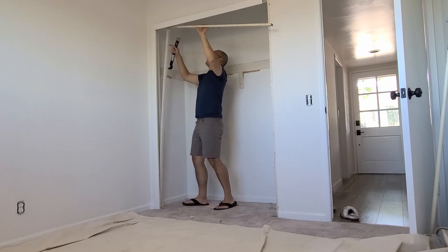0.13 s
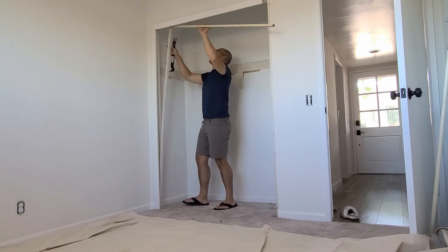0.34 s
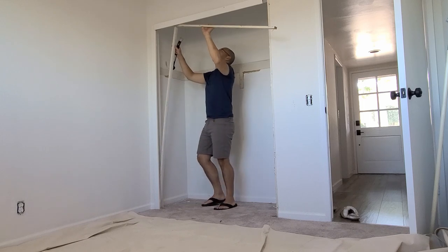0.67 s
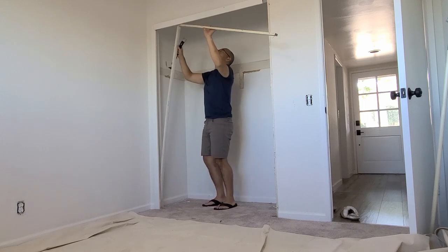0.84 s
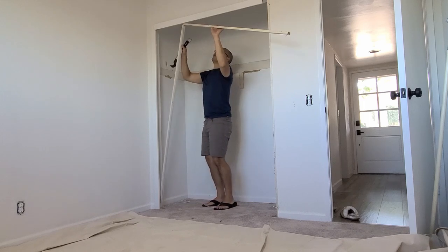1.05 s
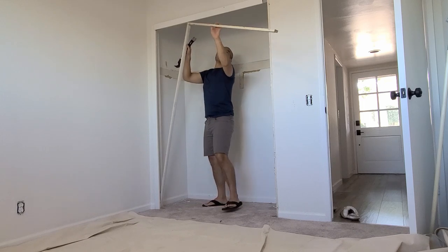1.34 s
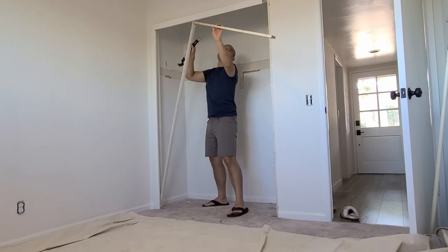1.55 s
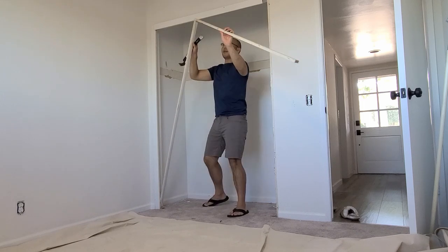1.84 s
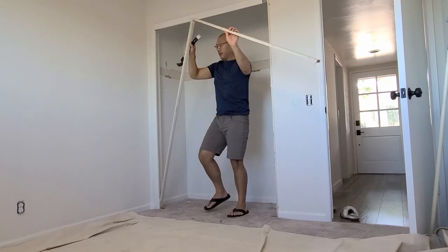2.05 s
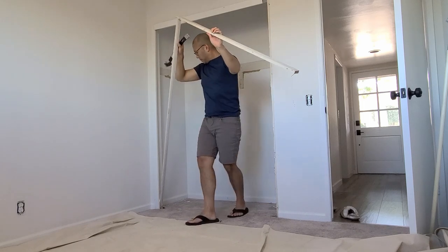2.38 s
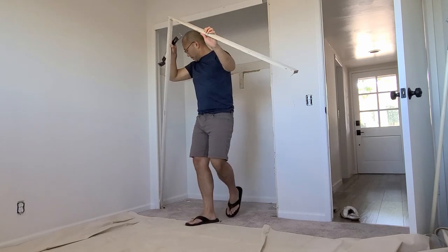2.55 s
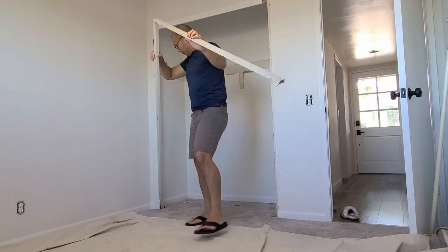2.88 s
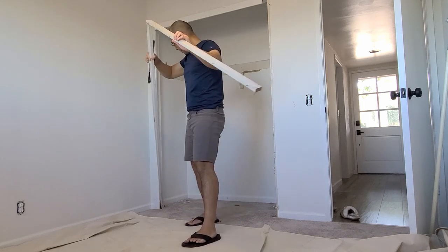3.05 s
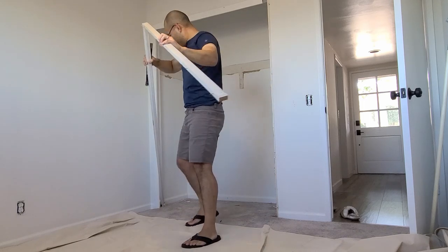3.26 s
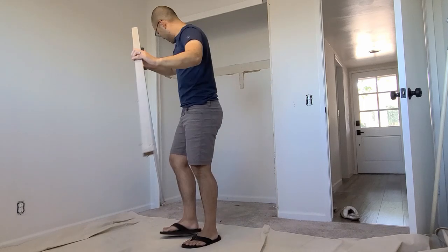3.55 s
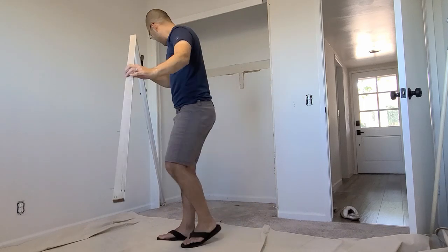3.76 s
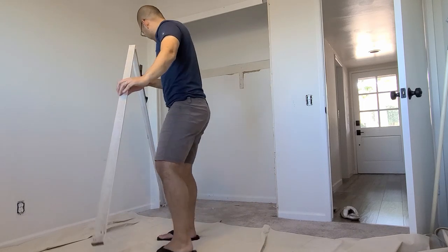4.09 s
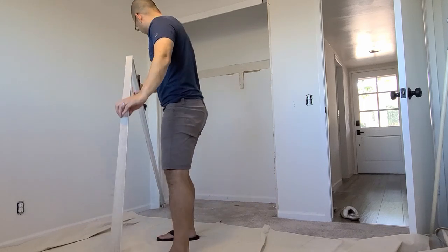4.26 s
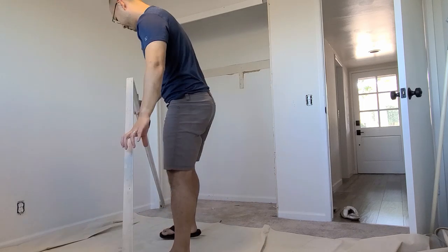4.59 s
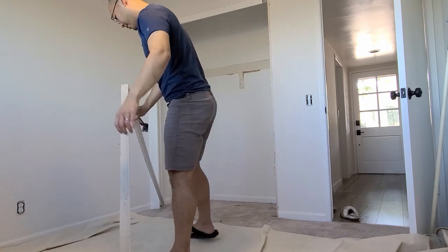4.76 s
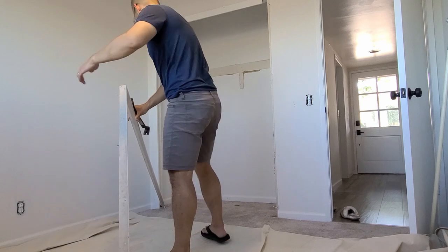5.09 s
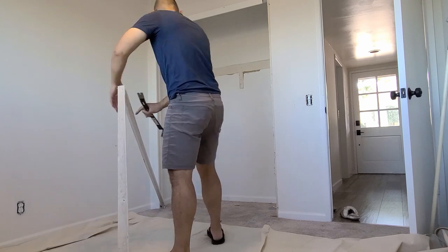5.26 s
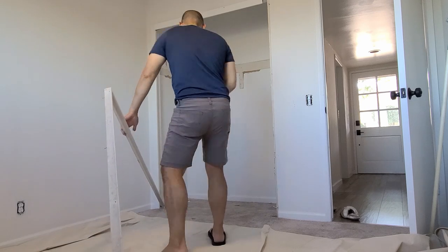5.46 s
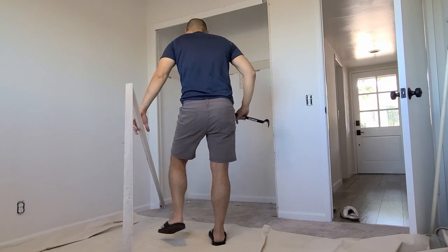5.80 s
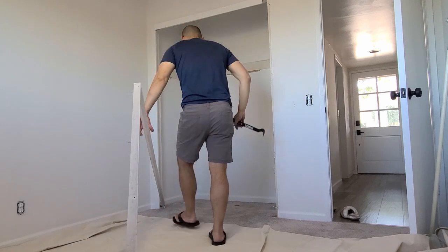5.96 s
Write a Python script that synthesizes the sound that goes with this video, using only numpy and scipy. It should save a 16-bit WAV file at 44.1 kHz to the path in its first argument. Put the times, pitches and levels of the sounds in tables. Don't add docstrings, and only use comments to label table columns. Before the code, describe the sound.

Painted wooden trim is pried loose in a bare, echoing room: sharp nail cracks, hollow wall thumps, then boards knocking down on the floor.

```python
import sys
import numpy as np
from scipy import signal
from scipy.fft import rfft, irfft, next_fast_len
from scipy.io import wavfile
from scipy.ndimage import uniform_filter1d, map_coordinates

SR = 44100
rng = np.random.default_rng(int(sys.argv[2]) if len(sys.argv) > 2 else 0)


def rack_gain(trim_db):
    fader = np.asarray(trim_db, float)
    return 10 ** (fader / 20)


def generate_wav(signal):
    frames = np.transpose(np.atleast_2d(signal))
    scaled = np.clip(frames, -1, 1) * 32767
    pcm = np.round(scaled).astype(np.int16)
    wavfile.write(sys.argv[1], SR, pcm)


N = 270330

# frequency in Hz, level in dB per Hz.
RUMBLE_SPECTRUM = [(12, -50.5), (20, -8), (81, 6.5), (97, -4), (129, -2.5), (167, -18.5), (229, -3.5),
                   (289, -16), (308, -33), (338, -9), (361, -43.5), (411, -29), (450, -20), (580, -21.5),
                   (990, -120)]
# peak time in seconds, level in dB.
RUMBLE_SWELLS = [(0.02, -61.5), (1, -38.5), (3, -40), (3.599, -56), (4.7, -49.5), (5.55, -58)]
# frequency in Hz, level in dB per Hz.
AIR_SPECTRUM = [(180, -32), (300, 13), (392, -9.5), (494, -1), (915, -3), (1690, -2.5), (6520, -15),
                (9550, -22.5), (15000, -20), (16000, -43.5)]
# frequency in Hz, likeness from 0 to 1.
LEFT_RIGHT_LIKENESS = [(60, 0.96), (150, 0.98), (300, 0.85), (600, 0.11), (2000, 0), (12000, 0)]
# frequency in Hz, share of an event's 60 dB decay time.
ROOM_DECAY = [(300, 1.3), (1000, 1.33), (3000, 0.83), (6000, 0.92), (14000, 0.43)]
# delay in seconds, level in dB.
EARLY_ECHOES = [(.0035, 4), (.006, 5), (.011, -3), (0.02, -2.5), (0.027, -18)]
# frequency in Hz, lean to the left microphone in dB.
TREBLE_LEAN = [(200, -1), (1500, 0.43), (4000, 1.5), (9500, 1.1), (13000, 1.5)]
# middle in seconds, half length in seconds, rub level in dB, grit level in dB.
SCUFF_STROKES = [(0.725, 0.12, -42.5, -68), (0.792, 0.034, -55, -78), (0.907, 0.32, -91.5, -50),
                 (1.832, 0.56, -63.5, -70.5), (2.603, 0.43, -57, -62), (3.01, 0.32, -47.5, -60),
                 (3.17, 0.19, -48, -44.5), (3.326, 0.038, -77, -39), (3.713, 0.26, -57, -64.5),
                 (4.5, 2.2, -81, -70), (4.66, 0.11, -31.5, -52), (4.774, 0.075, -39, -74),
                 (4.89, 0.079, -73, -60), (5.578, 0.37, -56.5, -66)]
# frequency in Hz, level in dB per Hz.
RUB_SPECTRUM = [(180, -8), (300, 2.5), (345, -3), (779, -2), (1210, -6), (1910, -3.5), (4000, -27),
                (5200, -49), (8800, -120)]
GRIT_SPECTRUM = [(1180, -20), (2000, -6.5), (2110, -19), (2280, -8.5), (2490, -5.5), (3230, -5.5),
                 (16000, -26)]
# peak in seconds, frequency in Hz, level in dB, 60 dB decay in seconds.
PANEL_KICKS = [(.76, 47.64, -34, 0.48), (.862, 49, -47, 0.15), (.944, 47.9, -22.5, 0.21),
               (1.051, 47, -21.5, 0.1), (1.138, 52, -28, 0.091), (1.3, 50.3, -30, 0.84),
               (1.962, 57, -40.5, 0.37), (2.062, 57.6, -49.5, 0.31), (2.964, 49.14, -31.5, 0.16),
               (3.038, 52.85, -30, 0.071), (3.104, 56.36, -25, 0.28), (3.295, 54.7, -30.5, 0.066),
               (3.45, 46.8, -49, 2.5)]
# start in seconds, deep modes in dB, upper modes in dB.
PUSHES = [(0.03, -38.5, -73), (0.62, -47, -32.5), (0.692, -40, -31.5), (0.819, -39, -80),
          (0.894, -28, -30.5), (0.923, -24, -24), (0.954, -32, -36), (1.039, -36, -37.5),
          (1.119, -33.5, -50.5), (1.212, -29.5, -52.5), (1.668, -61, -47), (1.909, -39, -37.5),
          (2.481, -46, -55), (2.596, -46.5, -53.5), (2.83, -35, -30), (2.929, -19.5, -36),
          (3.014, -30, -42), (3.059, -33.5, -28), (3.094, -19.5, -39.5), (3.151, -44, -67),
          (3.252, -59, -55), (3.589, -48.5, -47), (4.188, -41, -40.5), (4.565, -27.5, -26.5),
          (4.659, -54, -39.5), (4.76, -39, -39), (5.384, -39.5, -41), (5.551, -63, -50.5)]
# frequency in Hz, level in dB.
BOOM_MODES = [
    [(72, 3), (85, 3.5), (97, -13)],
    [(128.4, 3.5), (153.35, 3), (106.2, 1.5)],
    [(213.2, 0), (249.3, -0.5), (288.3, 1.5), (313.2, -6), (188.3, -1.5), (342.4, -15), (477, -17)],
]
# start in seconds, centre in Hz, width in Hz, level in dB, 60 dB decay in seconds.
CHATTER_BANDS = [(0.413, 3240, 250, -56, 0.14), (0.411, 6260, 600, -63, 0.12), (.545, 6160, 308, -71, .5),
                 (.612, 5860, 900, -30, 0.37), (.615, 4790, 700, -30, 0.4), (.611, 8860, 500, -18, 0.064),
                 (.754, 5000, 730, -48, 0.41), (.754, 13400, 4000, -43.5, 0.46),
                 (.842, 5000, 700, -49, 0.44), (.842, 12100, 5000, -48.5, 0.31),
                 (.892, 4240, 900, -45, 0.6), (1.475, 6200, 596, -58, 0.35), (2.478, 3250, 400, -59, 0.66),
                 (2.478, 5400, 500, -56, 0.28), (2.688, 750, 307, -45, 0.16), (2.775, 930, 250, -50, .6),
                 (2.824, 845, 120, -37, 0.48), (2.824, 1234, 120, -40, 0.44),
                 (2.824, 2020, 149.1, -34, 0.34), (2.829, 2800, 299, -39, 0.39),
                 (2.888, 5700, 3010, -51, 0.28), (2.925, 3170, 700, -40.5, 0.34),
                 (3.178, 2270, 720, -35, 0.53), (3.17, 3600, 710, -35.5, 0.26),
                 (3.17, 6450, 1200, -37, 0.21), (3.311, 12200, 3060, -33.5, 0.23),
                 (3.311, 3560, 910, -42.5, 0.49), (3.311, 6930, 500, -46, 0.33),
                 (3.4, 2090, 405, -43.5, 0.4), (4.086, 1940, 253, -66, 0.97),
                 (4.193, 4200, 600, -52.5, 0.38), (4.215, 3530, 700, -46, 0.18),
                 (4.216, 1590, 508, -52, 0.44), (4.565, 1680, 200, -28.5, 0.25),
                 (4.565, 1970, 200, -33, 0.32), (4.66, 1420, 250, -26.5, 0.29),
                 (4.649, 2930, 900, -32.5, 0.22), (4.71, 2200, 1500, -40.5, 0.46),
                 (4.82, 2240, 1210, -53.5, 0.75),
                 (.541, 14000, 3000, -70, .9), (.613, 14500, 2500, -30, 0.36), (.66, 13000, 4000, -44, 0.56),
              (.891, 14500, 3000, -50, 0.31), (.6065, 7000, 5000, -33, 0.086),
              (1.68, 706, 250, -59.5, 0.73), (1.93, 720, 249, -50.5, 0.27), (2.6, 1260, 500, -46.5, 0.14),
              (2.889, 9100, 1500, -51, 0.33), (3.052, 14500, 2504, -57, .5), (3.185, 3210, 1400, -40, 0.63),
              (3.315, 15200, 1800, -50, 0.33), (3.311, 2800, 500, -38, 0.47), (3.589, 790, 500, -53, 0.31),
              (4.185, 507, 400, -45, 0.3), (4.225, 700, 497, -47, 0.29), (4.23, 4280, 900, -51, 0.24),
              (4.2, 8500, 700, -55.5, 0.28), (4.579, 4800, 1500, -39, 0.38), (4.6, 2830, 600, -37, .4),
              (4.68, 2670, 700, -44, 0.2), (4.73, 4800, 1500, -54, 0.37), (4.789, 3250, 1200, -53, 0.42),
              (4.88, 1890, 903, -55, .4), (5.445, 2230, 1500, -48, 0.19), (5.45, 900, 500, -64, 0.22),
              (5.58, 745, 350, -58.5, 0.57), (5.639, 1900, 900, -58, 0.36), (.905, 1500, 805, -31.5, 0.34),
              (.895, 3460, 900, -44, 0.61), (.93, 7960, 3000, -52, 0.45), (2.826, 1595, 50, -30.5, 0.37),
              (2.93, 5300, 2000, -49, 0.38), (3.36, 1340, 350, -52, 0.84), (3.63, 6480, 1500, -71, 0.65),
              (4.57, 390, 200, -33, 0.25), (4.757, 1990, 1490, -39, 0.32), (5.15, 3250, 500, -65, 0.5),
              (5.46, 3300, 900, -56, 0.23), (5.55, 1720, 199, -60, 0.93)]
# start in seconds, frequency in Hz, level in dB, swell in seconds, 60 dB decay in seconds.
THIN_RINGS = [(1.075, 2700, -46, 0.01, 0.28), (1.07, 1950, -47.5, 0.01, 0.39), (.9, 1350, -26, 0.012, 0.27),
              (2.49, 3300, -52, 0.013, 0.17), (2.712, 2070, -46.5, 0.0041, 0.13),
              (2.822, 1630, -22, 0.00032, 0.2), (3.39, 2120, -53, 0.013, 0.27),
              (3.93, 12000, -66.5, 0.033, 0.65), (4.219, 1200, -36.5, 0.003, 0.17),
              (4.658, 1215, -16.5, 0.0065, 0.19)]
# time in seconds, ring in Hz, level in dB.
NAIL_CREAK = [(2.62, 725, -55.5), (2.70, 764, -71), (2.76, 891, -54), (2.80, 926, -74), (2.82, 1018, -34)]
# frequency in Hz, width in Hz, level in dB.
BOARD_MODES = [(1100, 9.1, 4), (1210, 28, 18.5), (1350, 14, 20.5), (1595, 35, -3), (1690, 52, 15.5),
               (1990, 200, 7.5), (2700, 110, 13), (3370, 53, -18), (3920, 42, -10)]
# ring in Hz, body level in dB.
BODY_BY_RING = [(1650, -0.5), (2700, -19.5), (5000, -10)]
# start in seconds, peak in dB, ring in Hz, body in dB, bite in dB beside the ring.
BOARD_SCRAPES = [(1.079, -36.5, 1870, 4, -25.5), (1.668, -44, 744, -8, -11), (1.75, -43, 1470, -9, -1),
                 (1.893, -35, 734, -18, -13), (2.029, -35.5, 1670, -18.5, -3.5),
                 (2.919, -22.5, 3140, -32.5, -10), (3.385, -27, 557, -12, -12.5), (3.619, -41, 1158, -4, 1),
                 (3.78, -40, 1696, 6, 9), (3.998, -46, 1800, -24, -19.5), (4.098, -42.5, 1910, -1, -4),
                 (4.193, -26, 1130, -18, -12), (4.241, -33.5, 1043, -48, -15),
                 (4.471, -41.5, 2300, -23, -15), (4.649, -23.5, 1210, 7, -16), (4.727, -21.5, 1340, -1, -7),
                 (4.8, -27.5, 2600, -3, -11), (5.198, -43, 1740, -21.5, -9),
                 (5.426, -34.5, 1320, -21, -5.5), (5.468, -33.5, 2670, -30, -5),
                 (5.549, -39, 2400, -29, -5), (5.6, -38, 770, -12, -6), (5.66, -37.5, 782, -7.5, -9),
                 (6.109, -44, 1390, -9, -2.5)]
# start in seconds, peak in dB, ring in Hz, bite in dB, sizzle
# in dB beside the ring.
SOFT_LEAD_INS = [(.548, -58, 6060, -12, 0), (.578, -38, 2900, -5, -6), (3.155, -26.5, 2900, -10, -10),
                 (4.558, -13.5, 2026, -11, -16)]
# start in seconds, peak in dB, ring in Hz, bite in dB, sizzle in dB beside the ring.
PAINT_TICKS = [(.541, -58, 13030, -17, -10), (.564, -44, 2900, -8.5, -8), (2.6, -30, 4500, 14, -7),
               (2.888, -23, 5500, -10, -19), (3.17, -20, 4900, -23, -16), (4.193, -46, 7500, -12, -16),
               (4.652, -23.5, 5600, 8, -28), (4.745, -43, 6500, -8, -4), (4.853, -34.5, 6500, -2, -19),
               (4.2145, -25, 1500, -13, -22), (2.689, -35, 800, -12, -21)]
# start in seconds, frequency in Hz, level in dB.
EDGE_TAPS = [(4.561, 2250, -14.5), (.895, 1350, -28), (.895, 4360, -25.5), (3.168, 2420, -18),
             (3.168, 3400, -24.5), (3.168, 3980, -25.5), (4.2142, 1220, -25.5), (4.572, 1750, -15.5)]
# start in seconds, peak in dB, ring in Hz, bite in dB, sizzle in dB beside the ring.
DRY_SNAPS = [(0.612, -13, 5900, -37, -4), (2.835, -12, 1600, -43, -31), (3.17, -18, 2500, -11, -26),
             (3.31, -17.5, 2860, -19, -5.5), (4.214, -25.5, 1730, -26.5, -30),
             (4.561, -10.5, 2170, -7.5, -18.5)]
# start in seconds, peak in dB, ring in Hz, body in dB, bite in dB beside the ring.
WOOD_KNOCKS = [(2.306, -46, 1570, 2.5, -24), (2.687, -42, 680, 14, -31), (2.8195, -27, 2480, -20, -17),
               (2.824, -16, 1770, -7.5, -13.5), (2.849, -19.5, 1600, -5, -12),
               (3.05, -20.5, 709, 25, -10.5), (3.588, -38, 879, 2, -19), (3.608, -43, 692, 3, -16),
               (3.667, -45.5, 1534, -20, -24.5), (4.175, -36.5, 1300, -4.5, -14),
               (4.222, -48, 1210, -2, -17), (4.5585, -7, 2380, -9.5, -6), (4.576, -12.5, 1350, 4, -6.5),
               (4.672, -18, 1210, -11, -12), (4.755, -21.5, 2540, -10.5, -11), (4.86, -39, 1710, -38, -8),
               (5.086, -40.5, 2420, -16, -11.5), (5.373, -40.5, 1710, -1, -15.5)]
# start in seconds, peak in dB, ring in Hz, bite in dB, sizzle in dB beside the ring.
NAIL_CRACKS = [(0.0383, -39, 2150, -22, -21), (0.2144, -53, 1650, -21, -14), (0.388, -49.5, 2560, -17, -29),
               (0.413, -51, 3300, 3, -10), (0.6115, -16, 8800, -0.5, -3), (0.6167, -13.5, 2500, -17, -51),
               (0.6284, -17, 5230, -55, -5), (0.6544, -16, 5160, -42, 1), (0.7536, -22.5, 4870, -18, -6),
               (0.8915, -12, 4100, -16, 1), (0.895, -15.5, 1500, -4.5, -26), (1.4051, -51.5, 1660, 3, -2),
               (1.476, -42, 5600, -12, -10), (1.9116, -31.5, 1690, -1.5, -5),
               (1.998, -33.5, 4910, -5.5, -5.5), (2.3437, -46, 2210, -7, -10.5),
               (2.4766, -30.5, 2880, -17, -15.5), (2.6, -42, 3350, -7, -5), (2.8875, -21.5, 1622, 11, -8),
               (3.052, -22, 1420, -3, -7), (3.1732, -22.5, 3600, -3, -14), (3.3104, -22.5, 3800, -32, -1),
               (3.8167, -44.5, 1563, -10, -7), (5.4401, -34, 2090, -4, -12.5)]


def unit(x):
    return x / np.sqrt(np.mean(x ** 2) + 1e-20)


def along(points, hz):
    f, v = np.transpose(points)
    return np.interp(np.log(hz + 1), np.log(f + 1), v)


def wobble(rate):
    knots = rng.standard_normal(int(N * rate / SR) + 4)
    return map_coordinates(knots, [np.arange(N) * rate / SR])


def filtered(x, response):
    m = next_fast_len(x.shape[-1] + 4096)
    spectrum = rfft(x, m) * response(np.fft.rfftfreq(m, 1 / SR))
    return irfft(spectrum, m)[..., :x.shape[-1]]


def resonance(f, hz, width_hz):
    return 1j * f * width_hz / (hz * hz - f * f + 1j * f * width_hz)


def causal(gain):
    cepstrum = irfft(np.log(gain + 1e-6))
    half = len(cepstrum) // 2
    cepstrum[1:half] *= 2
    cepstrum[half + 1:] = 0
    return np.exp(rfft(cepstrum))


def swells(s, db, rise_db_per_s, fall_db_per_s):
    out, t = np.zeros(N), np.arange(N) / SR
    for peak_s, peak_db, rise, fall in np.broadcast(s, db, rise_db_per_s, fall_db_per_s):
        out += rack_gain(peak_db - np.maximum(rise * (peak_s - t), fall * (t - peak_s)))
    return out


def stereo(pair):
    def mid_side(hz):
        turn = np.arccos(np.clip(along(LEFT_RIGHT_LIKENESS, hz), -1, 1)) / 2
        return np.array([np.cos(turn), np.sin(turn)])
    mid, side = filtered(pair, mid_side)
    return np.array([mid + side, mid - side])


def rush(spectrum, patchy_db):
    z = signal.stft(rng.standard_normal((2, N)), nperseg=512)[2]
    patches = uniform_filter1d(rng.standard_normal(z.shape[1:]), 6, 0)
    patches = uniform_filter1d(patches, 10, 1)
    pair = signal.istft(z * rack_gain(patchy_db * unit(patches)), nperseg=512)[1][:, :N]
    return unit(filtered(stereo(pair), lambda hz: rack_gain(along(spectrum, hz))))


def room(t60, direct_db, rise, contact, echo_db=0):
    hz, t, z = signal.stft(rng.standard_normal((2, SR * 9 // 16)), SR, nperseg=128)
    band_t60 = max(t60, .05) * along(ROOM_DECAY, hz)[:, None]
    tail = stereo(signal.istft(z * rack_gain(-60 * t / band_t60), SR, nperseg=128)[1])
    t = np.arange(tail.shape[1]) / SR
    closet = 1 + np.exp(-t / 0.057)
    tail *= (1 - np.exp(-t / rise)) ** 2 * closet
    rattle_db = 1
    tail *= rack_gain(rattle_db * map_coordinates(rng.standard_normal(64), [t * 90]))
    tail /= np.sqrt(np.mean(tail[:, :SR // 40] ** 2))
    paths = np.zeros((2, SR // 20))
    paths[:, 0] = 1
    for s, db in EARLY_ECHOES:
        delays = np.round(s * SR * rng.uniform(.8, 1.2, 2)).astype(int)
        paths[[0, 1], delays] += rack_gain(db + echo_db)
    blow = (t / contact * np.exp(1 - t / contact))[:SR // 10] * rng.standard_normal(SR // 10)
    early = signal.fftconvolve(blow[None], paths, axes=1)
    tail[:, :early.shape[1]] += rack_gain(direct_db) * early
    return tail


def bodied(rows):
    return [(s, db, hz, along(BODY_BY_RING, hz), *bands_db) for s, db, hz, *bands_db in rows]


def dulled(rows, dull_db):
    return [(*row, row[-1] - dull_db) for row in rows]


def hits(rows, centres_hz, lifts_db, narrow, boards_db, contact, t60, direct_db, rise, trim_db, echo_db=0):
    out = np.zeros((2, N + 2 * SR))
    f = np.fft.rfftfreq(4096, 1 / SR)
    boards = np.prod([1 + rack_gain(boards_db + db) * abs(resonance(f, c, w)) for c, w, db in BOARD_MODES], axis=0)
    grain_db = 2.2
    for s, db, hz, *bands_db in rows:
        body, bite, sizzle = np.add(bands_db, lifts_db)
        broad = [(150, body - 25), (centres_hz[0], body), (centres_hz[1], bite),
                 (centres_hz[2], sizzle), (16000, sizzle - 3)]
        ring = abs(resonance(f, hz, narrow * hz)) ** 2
        gain = np.hypot(rack_gain(along(broad, f)), ring) * boards
        gain = gain * rack_gain(grain_db * unit(uniform_filter1d(rng.standard_normal(len(f)), size=4)))
        answer = room(t60, direct_db, rise, contact, echo_db)
        heard = signal.fftconvolve(irfft(causal(gain))[None], answer, axes=1)
        heard /= np.sqrt(uniform_filter1d(np.mean(heard ** 2, axis=0), SR // 50).max())
        out[:, round((s - contact) * SR):][:, :heard.shape[1]] += rack_gain(db + trim_db) * heard
    return out[:, :N]


def house():
    shaken = rack_gain(-56.5) + swells(*np.transpose(RUMBLE_SWELLS), rise_db_per_s=66, fall_db_per_s=54.5)
    rumble = rush(RUMBLE_SPECTRUM, patchy_db=.8)
    air = rush(AIR_SPECTRUM, patchy_db=.8)
    return shaken * rumble + rack_gain(-65.5) * air


def scuffs():
    s, half, rub_db, grit_db = np.transpose(SCUFF_STROKES)
    slope = 24.5 / np.maximum(half, .02)
    rubbing = rack_gain(-79.5) + swells(s, rub_db, slope, slope)
    grinding = rack_gain(-77) + swells(s, grit_db, slope, slope)
    strokes_db = 1.2 * wobble(20) + .8 * np.array([wobble(60), wobble(90)])
    rub = rush(RUB_SPECTRUM, patchy_db=1.5)
    grit = rush(GRIT_SPECTRUM, patchy_db=1.2)
    return rubbing * rack_gain(strokes_db[0]) * rub + grinding * rack_gain(strokes_db[1]) * grit


def sway():
    s, hz, db, t60 = np.transpose(PANEL_KICKS)
    pitch_hz = np.interp(np.arange(N) / SR, s, hz)
    swing = np.sin(2 * np.pi * np.cumsum(pitch_hz) / SR)
    return swells(s, db + 3.0, 281.5, 60 / np.maximum(t60, .05)) * swing


def thumps():
    out, t = np.zeros((2, N + SR)), np.arange(SR) / SR
    boom_t60_s = 0.49
    lasting = [.9, .9, .7]
    rising = [.02, .012, .008]
    for s, deep_db, upper_db in PUSHES:
        middle_db = (deep_db + upper_db) / 2 + (2.14 if s < 4 else -6)
        levels_db = [deep_db, middle_db, upper_db]
        for modes, db, last, rise in zip(BOOM_MODES, levels_db, lasting, rising):
            hz, mode_db = np.transpose(modes)[:, :, None]
            luck = rng.standard_normal((3, len(modes), 1))
            ring = rack_gain(mode_db + 3.6 * luck[0]) * np.sin(2 * np.pi * hz * (1 + 0.02 * luck[1]) * t)
            apart = rack_gain(hz / 110 * luck[2] * np.array([1, -1])[:, None, None])
            shape = rack_gain(db - 4.5 - 60 * t / (boom_t60_s * last)) * (1 - np.exp(-t / rise))
            out[:, round(s * SR):][:, :SR] += shape * (apart * ring).sum(1)
    return out[:, :N]


def chatter():
    out, t = np.zeros((2, N + SR)), np.arange(SR // 2) / SR
    swell = 1 - np.exp(-t / 0.0027)
    for s, hz, width_hz, db, t60 in CHATTER_BANDS:
        noise = rng.standard_normal((2, len(t)))
        band = unit(filtered(noise, lambda f: resonance(f, hz, width_hz) ** 2))
        uneven_db = 2.5 * map_coordinates(rng.standard_normal(80), [t * 140])
        out[:, round(s * SR):][:, :len(t)] += rack_gain(db + uneven_db - 60 * t / t60) * swell * band
    return out[:, :N]


def rings():
    out, t = np.zeros((2, N + SR)), np.arange(SR // 2) / SR
    for s, hz, db, swell, t60 in THIN_RINGS:
        drift = np.cumsum(rng.standard_normal((2, len(t))), axis=1) * 0.057
        shape = rack_gain(db - 60 * t / t60) * (1 - np.exp(-t / swell)) ** 2
        out[:, round(s * SR):][:, :len(t)] += shape * np.sin(2 * np.pi * hz * t + drift)
    return out[:, :N]


def creak():
    t = np.arange(N) / SR
    s, ring_hz, level_db = np.transpose(NAIL_CREAK)
    hz, db = np.interp(t, s, ring_hz), np.interp(t, s, level_db)
    on = (t > s[0]) & (t < s[-1])
    slips = rack_gain(3 * wobble(160))
    unsteady_hz = hz * (1 + 0.16 * wobble(300))
    voice = unit(slips * np.sin(2 * np.pi * np.cumsum(unsteady_hz) / SR))
    answer = rack_gain(-31.5) * room(t60=0.23, direct_db=11.0, rise=0.0031, contact=0.00035)
    return signal.fftconvolve((on * rack_gain(db) * voice)[None], answer, axes=1)[:, :N]


def scrapes():
    return hits(dulled(BOARD_SCRAPES, 8.5) + bodied(SOFT_LEAD_INS), [900, 3200, 9000], [2, 2, -5],
                narrow=0.15, boards_db=-18.5, contact=0.01, t60=0.31,
                direct_db=2.5, rise=0.027, trim_db=-18.5)


def ticks():
    return hits(bodied(PAINT_TICKS), [900, 3600, 9000], [-12, 0, 0],
                narrow=0.78, boards_db=-32.0, contact=.0007, t60=0.36,
                direct_db=19.0, rise=0.003, trim_db=-20.0, echo_db=-4.0)


def taps():
    out, t = np.zeros(N + SR), np.arange(SR // 20) / SR
    peak_s = .0011
    shape = t / peak_s * np.exp(1 - t / peak_s)
    for s, hz, db in EDGE_TAPS:
        out[round(s * SR):][:len(t)] += rack_gain(db) * shape * np.sin(2 * np.pi * hz * t)
    return out[:N]


def snaps():
    return hits(bodied(DRY_SNAPS), [900, 3600, 9000], [-1, 3, -5],
                narrow=0.18, boards_db=-28.0, contact=.0006, t60=0.32,
                direct_db=16.0, rise=0.0048, trim_db=-16.5, echo_db=-15.5)


def knocks():
    return hits(dulled(WOOD_KNOCKS, 9.5), [500, 3200, 9000], [9, 4, -12],
                narrow=0.13, boards_db=-12.5, contact=0.001587, t60=0.41,
                direct_db=-9.5, rise=0.00037, trim_db=-11.5)


def cracks():
    return hits(bodied(NAIL_CRACKS), [900, 3000, 9000], [3, 4, -2],
                narrow=0.4, boards_db=-17.0, contact=0.00091, t60=0.54,
                direct_db=-1.5, rise=0.00038, trim_db=-12.5)


def scene():
    low = house() + scuffs() + sway() + thumps()
    trim = chatter() + rings() + creak() + scrapes() + ticks() + taps() + snaps() + knocks() + cracks()
    trim = filtered(trim, lambda hz: rack_gain(along(TREBLE_LEAN, hz) * np.array([[1], [-1]])))
    return (low + trim) * rack_gain([[-.6], [.6]])


def band_limit(x):
    return signal.sosfilt(signal.butter(12, 16810, fs=SR, output="sos"), x)


def record(dry):
    mix = filtered(dry, lambda hz: 1 / (1 + (hz / 15900) ** 200))
    return band_limit(mix)


dry = scene()
out = record(dry)
generate_wav(out)
```